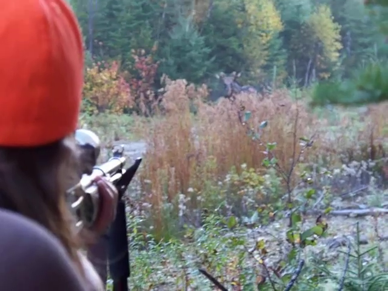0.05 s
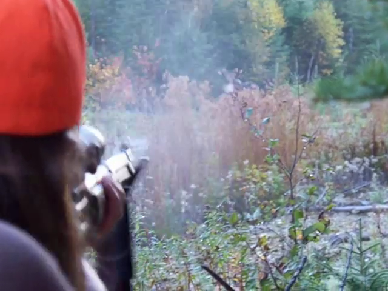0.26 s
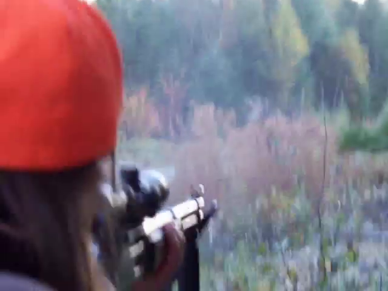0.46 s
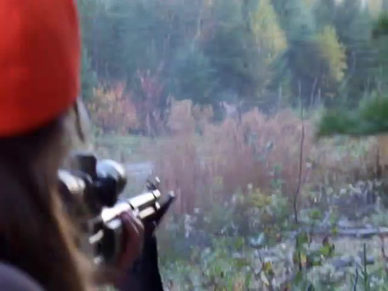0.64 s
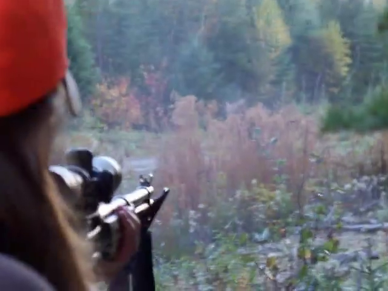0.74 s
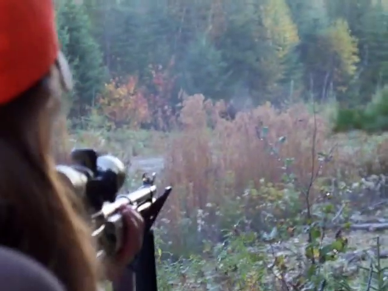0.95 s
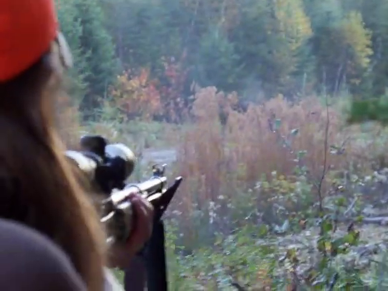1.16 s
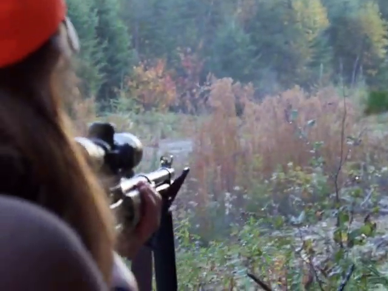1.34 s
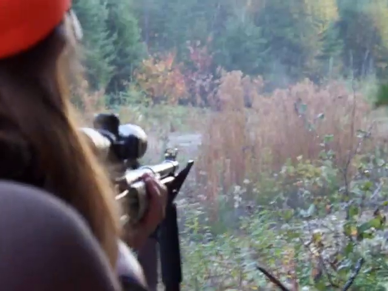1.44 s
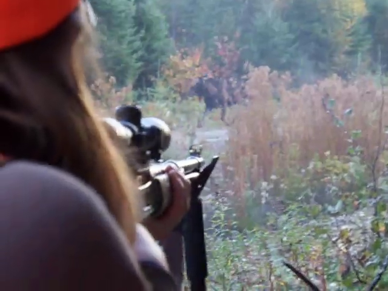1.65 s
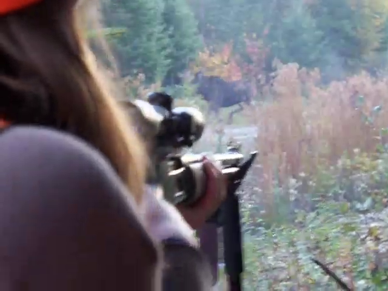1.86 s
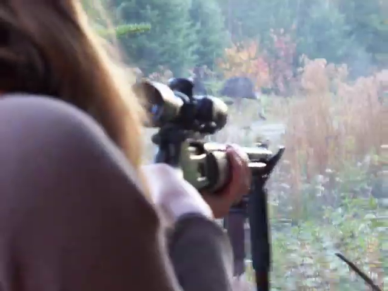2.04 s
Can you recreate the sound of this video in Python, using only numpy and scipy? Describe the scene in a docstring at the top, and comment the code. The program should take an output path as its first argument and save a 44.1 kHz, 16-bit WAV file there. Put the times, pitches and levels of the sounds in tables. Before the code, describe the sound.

A single close rifle shot bursts out of quiet woods, crushed and distorted on a small mono microphone, with a dense roar for under half a second, then scattered tree echoes fading into a dull distant rumble.

```python
"""Quiet woods: soft air noise and a faint, mostly falling bird note come just before a single rifle shot.
The blast overloads the input of a small camera in a clearing ringed by forest.
Leaves hiss, deep rolls swell, and countless trunks scatter the blast as a grainy rumble that dulls with
distance; a low punch, distinct echoes and bright snaps stand out of the tail.
The mix is clipped, band-limited, faded briefly at the end and clipped again."""
import sys
import numpy as np
from scipy import signal
from scipy.io import wavfile

SR = 44100
rng = np.random.default_rng(int(sys.argv[2]) if len(sys.argv) > 2 else 0)


def output_pcm(signal):
    """Save a mono or channel-first signal as 16-bit PCM at the path in sys.argv[1].

    Samples are clipped to [-1, 1] before scaling.
    """
    pcm = np.clip(np.atleast_2d(signal).T, -1, 1) * 32767
    wavfile.write(sys.argv[1], SR, np.round(pcm).astype(np.int16))


def natural_amplitude(level_db):
    """Convert a level in decibels to a linear amplitude factor, elementwise."""
    exponent = np.asarray(level_db, float) / 20
    return 10 ** exponent


N = 92610
T = np.arange(N) / SR  # s
SHOT_S, RISE_S = 0.2222, 0.003  # start of the shot, rise of the sound it excites
BAND_HZ = 7020  # edge of the band limit


def read(points, hz):
    """Spectral envelope: dB interpolated over log frequency, held constant above the band edge."""
    f, db = np.transpose(points)
    return np.interp(np.log(np.minimum(hz, BAND_HZ) + 1), np.log(f + 1), db)


def evened(x):
    """Normalisation to unit mean power."""
    return x / np.sqrt(np.mean(x ** 2) + 1e-20)


def coloured(x, shape_db):
    """Time-varying filtering: short-time spectra weighted by shape_db(hz, t), at constant power for white x."""
    hz, t, spectra = signal.stft(x, SR, nperseg=1024, noverlap=896)
    gain = natural_amplitude(shape_db(hz[:, None], t[None]))
    gain = gain / np.sqrt((gain ** 2).mean(0))
    return signal.istft(spectra * gain, SR, nperseg=1024, noverlap=896)[1][:N]


def onset():
    """Causality: a linear rise that keeps what the shot excites silent until it fires."""
    return np.clip((T - SHOT_S) / RISE_S, 0, 1)


# spectrum of the quiet air: (f/Hz, relative density level/dB)
AIR_SPECTRUM = [(18, -48.5), (30, 9), (234, -8), (544, -11), (582, -8.5), (653, -11.5), (3960, -19),
                (6390, -22), (7000, -22), (9100, -60.5), (15400, -120)]
# glide of the bird note: (t/s, f/Hz, peak level/dB)
BIRD_GLIDE = [(.105, 7400, -87), (.125, 7150, -74), (.16, 6900, -68), (.2, 7060, -78)]


def woods():
    """Stationary filtered noise for the air, and frequency modulation of one sine for the bird."""
    air_db = -59  # rms
    air = coloured(rng.standard_normal(N), lambda hz, t: read(AIR_SPECTRUM, hz))
    s, hz, db = np.transpose(BIRD_GLIDE)
    phase = 2 * np.pi * np.cumsum(np.interp(T, s, hz)) / SR
    note = np.sin(phase) * natural_amplitude(np.interp(T, s, db, -200, -200))
    return natural_amplitude(air_db) * air + note


def blast():
    """Impulsive pressure wave, then displacement of the overloaded capsule: pushed in, out, creeping back."""
    blast_db, blast_s = -12, 0.0008  # scale and time constant of the muzzle wave
    push_db, push_s = -4.5, 0.0071  # peak and time constant of the inward push
    swing_db, swing_rise_s, creep_s = -4.5, 0.027, 0.1  # scale, rise and decay of the outward swing
    t = np.maximum(T - SHOT_S, 0)
    u = t / blast_s
    wave = -2 * natural_amplitude(blast_db) * np.e * u * (1 - u / 2) * np.exp(-u)
    push = -natural_amplitude(push_db) * (np.e * t / push_s / 2) ** 2 * np.exp(-t / push_s)
    swing = natural_amplitude(swing_db) * (1 - np.exp(-t / swing_rise_s)) * np.exp(-t / creep_s)
    return (T > SHOT_S) * (wave + push + swing)


# sound scattered back by the trees: (t/s, rms level/dB, share of far colour 0-1)
SCATTER_DECAY = [(.222, -23, 0.2), (0.248, 8.5, 0.05), (.3, -2, 0.04), (.36, -2.5, 0.16), (.42, 4, 0),
                 (0.469, -2, 0), (0.519, -9, 0.16), (.65, -14, 0.29), (.8, -20.5, 0.41), (.9, -24, 0.48),
                 (1.02, -27, 0.57), (1.149, -27.5, 0.63), (1.24, -30, .7), (1.33, -28.5, 0.86),
                 (1.42, -31.5, 0.82), (1.52, -31.5, 0.87), (1.66, -33, 1), (1.76, -33, 0.92),
                 (1.85, -34, 0.92), (1.91, -30, 0.97), (2.1, -33.5, 1)]
# spectrum of scatter over short paths: (f/Hz, relative density level/dB)
NEAR_SPECTRUM = [(30, -27.5), (65, -27), (178, -25.5), (337, -9), (532, -8.5), (620, -2.5), (820, -2),
                 (1050, -7.5), (1500, -6.5), (2000, -9), (2800, -8.5), (4200, -12), (7000, -18.5)]
# spectrum of scatter over long paths: (f/Hz, relative density level/dB)
FAR_SPECTRUM = [(30, -26), (86, -23), (129, -16.5), (174, -9.5), (300, -5.5), (474, -5), (668, -0.5),
                (820, -5), (1030, -11.5), (1630, -15), (2400, -19.5), (3200, -28.5), (4200, -38),
                (7000, -51.5)]


def scatter():
    """Multiple scattering: one click of uneven size per trunk, its spectrum set by the path length."""
    trunks_per_s, trunk_spread_db = 6000, 2.5  # mean density, scale of the size spread
    s, db, far = np.transpose(SCATTER_DECAY)
    clicks = rng.choice([-1., 1.], N) * (rng.random(N) < trunks_per_s / SR)
    clicks = clicks * natural_amplitude(trunk_spread_db * np.minimum(rng.exponential(1, N), 4))

    def path_colour(hz, t):
        """Path-dependent spectrum: a blend in dB from near to far colour."""
        near_db = read(NEAR_SPECTRUM, hz)
        return near_db + np.interp(t, s, far) * (read(FAR_SPECTRUM, hz) - near_db)

    rumble = coloured(evened(clicks), path_colour)
    return rumble * natural_amplitude(np.interp(T, s, db)) * onset()


# hiss of the blast off nearby leaves and brush: (t/s, rms level/dB)
BRUSH_DECAY = [(.222, -6), (.235, 0), (.3, -1.5), (.36, -7.5), (.42, -6), (.5, -19), (.7, -44.5),
               (0.999, -80), (1.4, -95)]
# spectrum of that hiss: (f/Hz, relative density level/dB)
LEAF_SPECTRUM = [(300, -32.5), (1000, -9.5), (1500, 0.5), (2000, -5), (2800, -0.5), (4500, -2.5), (6400, 1),
                 (7100, -3.5)]


def brush():
    """Diffuse reflection: dense bright noise follows the blast and decays fast."""
    s, db = np.transpose(BRUSH_DECAY)
    hiss = coloured(rng.standard_normal(N), lambda hz, t: read(LEAF_SPECTRUM, hz))
    return hiss * natural_amplitude(np.interp(T, s, db, right=-200)) * onset()


# deep returns from the ground and far slopes: (centre t/s, rms level at centre/dB, Gaussian width/s)
ROLL_SWELLS = [(0.251, -9, 0.022), (.31, -14, 0.056), (0.459, -24.5, 0.024), (.56, -28, 0.036),
               (1.332, -43, 0.035), (1.799, -37.5, 0.047), (1.919, -40.5, .04)]
# spectrum of the deep returns: (f/Hz, relative density level/dB)
ROLL_SPECTRUM = [(30, -14), (70, -8.5), (130, 5), (300, 6.5), (450, -10), (900, -55.5)]


def rolls():
    """Low-frequency reverberation: Gaussian swells of dull noise under the roar and late in the tail."""
    noise = coloured(rng.standard_normal(N), lambda hz, t: read(ROLL_SPECTRUM, hz))
    swells = sum(natural_amplitude(db) * np.exp(-.5 * ((T - s) / width) ** 2) for s, db, width in ROLL_SWELLS)
    return noise * (T > SHOT_S) * swells


# distinct returns from a few stands of trees: (start t/s, envelope peak level/dB)
STAND_ECHOES = [(.579, -5), (.805, -9), (.981, -18), (1.025, -15), (1.264, -21), (1.285, -21), (1.327, -19),
                (1.442, -21), (1.51, -25), (1.567, -25), (1.642, -23), (1.89, -18), (1.92, -22),
                (1.971, -24), (2.076, -24)]


def echoes():
    """Specular reflection: one low punch from the tree line, then short dull blips that start sharply."""
    thump_s, thump_db, thump_hz, thump_width_s = 0.3878, 3.5, 116.3, 0.0022
    echo_hz, echo_s = 720, 0.0018  # pitch and time constant of a blip
    u = T - thump_s
    punch = natural_amplitude(thump_db) * np.exp(-.5 * (u / thump_width_s) ** 2) * np.cos(2 * np.pi * thump_hz * u)
    blips = np.zeros(N)
    for s, db in STAND_ECHOES:
        u = np.maximum(T - s, 0) / echo_s
        envelope = np.e * u * np.exp(-u)
        blips += natural_amplitude(db) * envelope * np.sin(2 * np.pi * echo_hz * echo_s * u)
    return punch + blips


# bright snaps in the tail, each centred 1 ms after its time: (t/s, peak level/dB)
TAIL_TICKS = [(1.0221, -31), (1.0934, -28), (1.1513, -28), (1.6616, -45), (1.7534, -43)]


def ticks():
    """Transient wave packets: about one cycle of cosine under a narrow Gaussian window."""
    tick_hz, width_s = 4200, 0.00015
    snaps = np.zeros(N)
    for s, db in TAIL_TICKS:
        u = T - s - .001
        snaps += natural_amplitude(db) * np.exp(-.5 * (u / width_s) ** 2) * np.cos(2 * np.pi * tick_hz * u)
    return snaps


def scene():
    """Linear superposition of all sources in one channel."""
    return (woods() + blast() + scatter() + brush() + rolls() + echoes() + ticks())[None]


def band_limit(x):
    """A steep low-pass at the top of the band."""
    return signal.sosfilt(signal.butter(12, 15840, fs=SR, output="sos"), x)


def record(dry):
    """Amplitude limiting: input overload, steep band limit, a quick end fade, then a second hard ceiling."""
    input_limit, final_limit, fade_s = 0.68, 0.715, 0.003  # limits relative to full scale
    x = np.clip(dry, -input_limit, input_limit)
    x = signal.sosfilt(signal.cheby1(7, .5, BAND_HZ, fs=SR, output="sos"), x)
    x = x * np.minimum(np.arange(N)[::-1] / (fade_s * SR), 1)
    return band_limit(np.clip(x, -final_limit, final_limit))


dry = scene()
out = record(dry)
output_pcm(out)
```